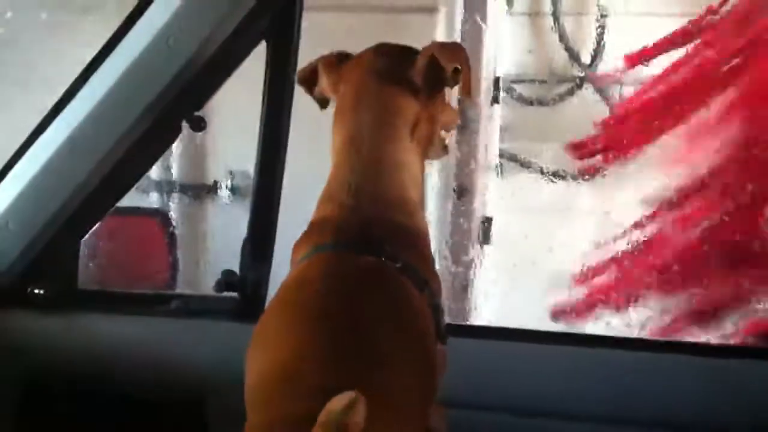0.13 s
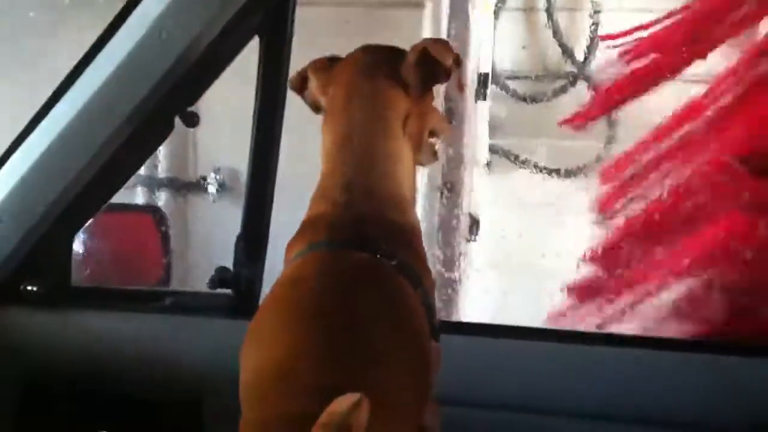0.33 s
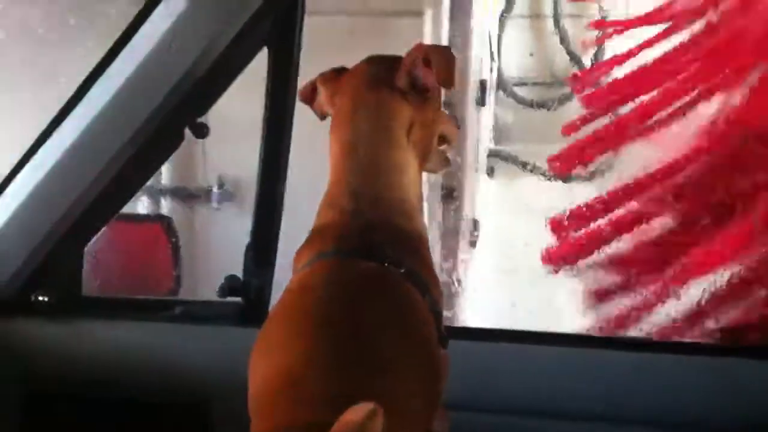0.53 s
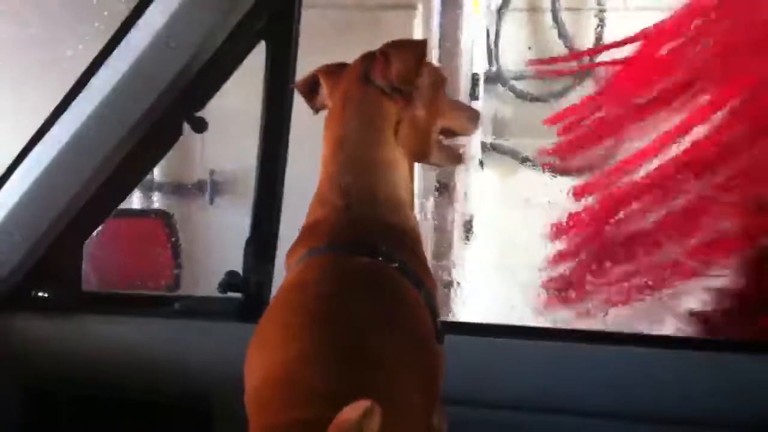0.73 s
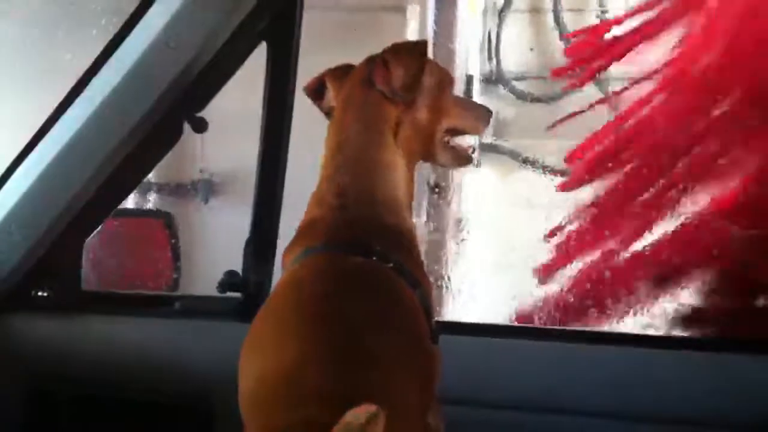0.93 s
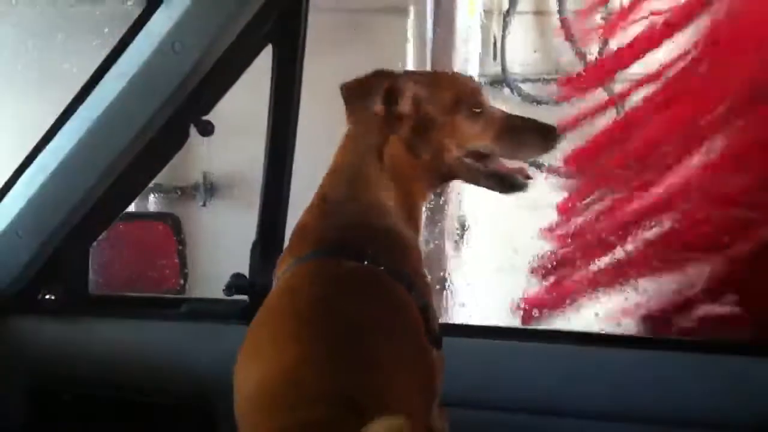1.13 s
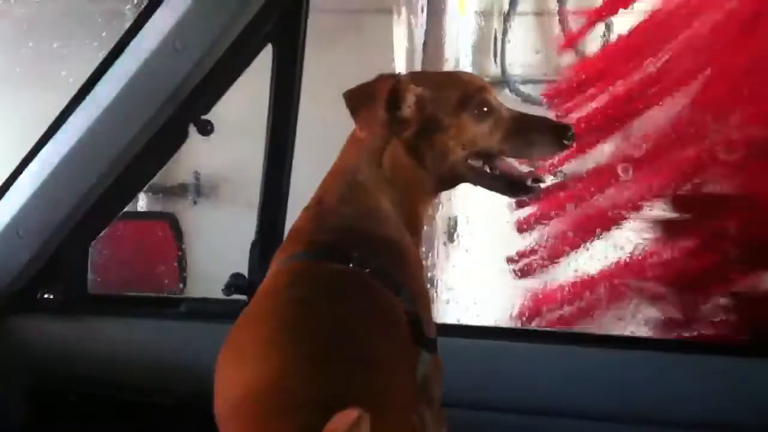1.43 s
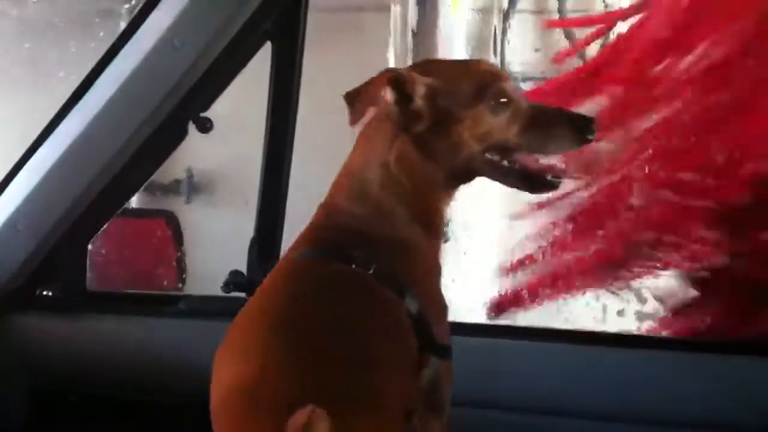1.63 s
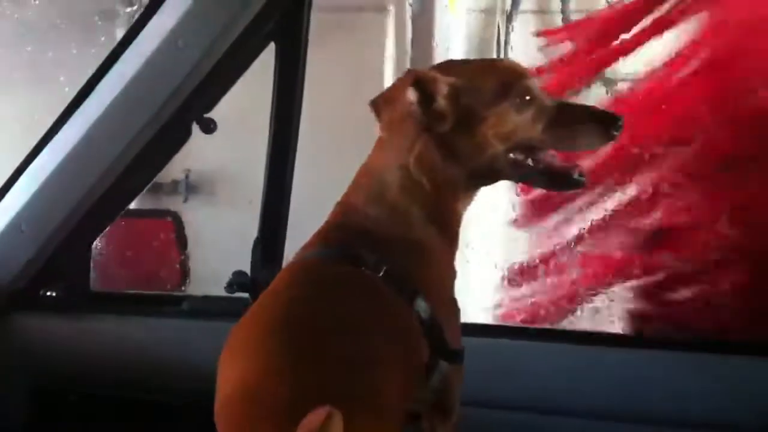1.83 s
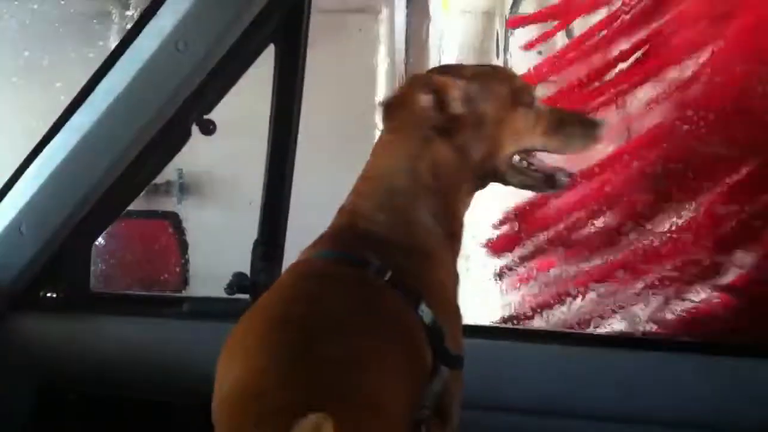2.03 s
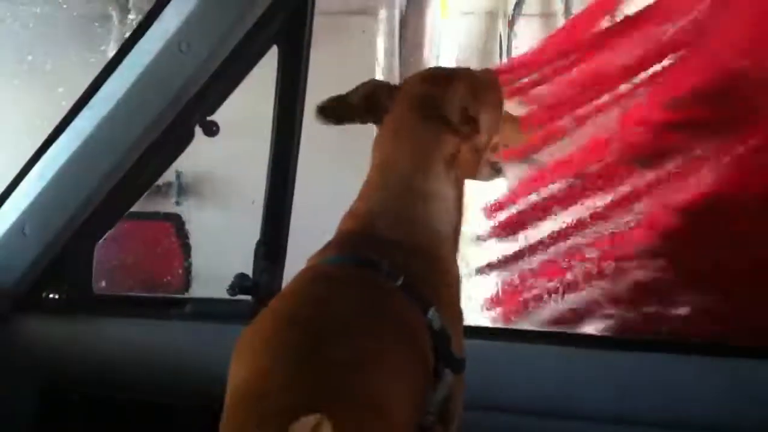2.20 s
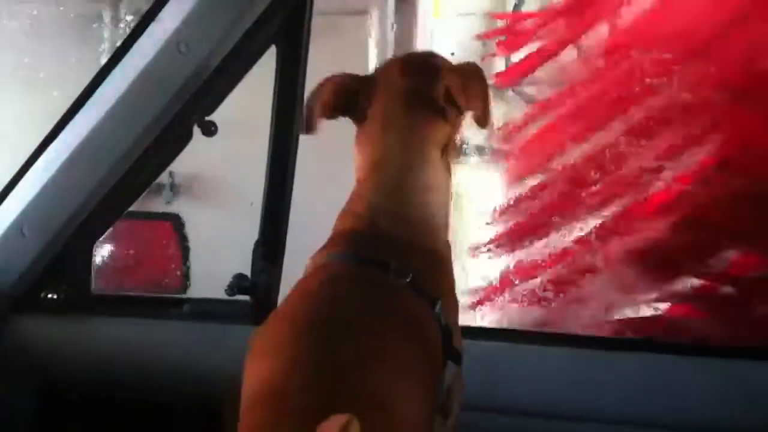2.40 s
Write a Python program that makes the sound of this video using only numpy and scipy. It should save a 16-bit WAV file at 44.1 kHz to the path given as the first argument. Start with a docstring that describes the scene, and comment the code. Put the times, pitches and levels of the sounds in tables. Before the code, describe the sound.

A spinning car wash brush drums deeply on a closed car. Heavy cloth thuds on the door while wet strips slap, swish and briefly squeak on the side window over rushing spray, heard from the front seat.

```python
"""A deep drumming booms through a closed car: the spinning cloth brush of a car wash beats on the body.
Heavy wads of cloth thud on the door, and wet strips slap, swish and squeak along the side window.
Spray patters on the glass, and now and then a sharp splash hits.
Behind it all the machinery and water rush on, slowly fading."""
import sys
import numpy as np
from scipy import signal
from scipy.fft import rfft, irfft, next_fast_len
from scipy.io import wavfile
from scipy.ndimage import uniform_filter1d

SR = 44100
rng = np.random.default_rng(int(sys.argv[2]) if len(sys.argv) > 2 else 0)


def unload_wav(signal):
    """Save mono or channel-first audio to the path in sys.argv[1] as 16-bit WAV at rate SR, clipped to [-1, 1]."""
    wavfile.write(
        sys.argv[1],
        SR,
        np.round(np.clip(np.atleast_2d(signal).T, -1, 1) * 32767).astype(np.int16),
    )


N = 112896
TIME = np.arange(N) / SR
PRE_ROLL = 8000  # samples, so textures are already sounding at the start


def from_db(db):
    """Decibels to gain."""
    return 10 ** (np.asarray(db) / 20)

def unit_rms(x):
    """Normalise to rms 1."""
    return x / np.sqrt(np.mean(x ** 2) + 1e-20)

def leveller(x, span_s):
    """Hold the running level of a texture at 1."""
    return x / np.sqrt(uniform_filter1d(x ** 2, max(int(span_s * SR), 2)) + 1e-9)

def fader(points):
    """Gain curve through (time [s], level [dB]) points."""
    return from_db(np.interp(TIME, *np.transpose(points)))

def envelope(start, attack_s, hold_s, t60_s):
    """Linear attack, hold, exponential release."""
    age = TIME - start
    return np.clip(age / attack_s, 0, 1) * 1000 ** (-np.maximum(age - attack_s - hold_s, 0) / t60_s)

def drift(rate_hz):
    """Smooth random modulation, rms 1."""
    step = 40  # samples per control point
    pole = np.exp(-2 * np.pi * rate_hz * step / SR)
    noise = rng.standard_normal(N // step + 2002)
    slow = signal.lfilter([1], [1, -2 * pole, pole * pole], noise)[2000:]
    return np.interp(np.arange(N) / step, np.arange(len(slow)), unit_rms(slow))

def impacts(per_s, spread_db):
    """Random clicks of either polarity and scattered level, pre-roll included."""
    count = N + PRE_ROLL
    hits = rng.random(count) < per_s / SR
    strength = from_db(spread_db * np.clip(rng.standard_normal(count), -2, 2))
    return hits * rng.choice([-1, 1], count) * strength + 1e-18

def equalise(x, curve):
    """Minimum-phase EQ that drops the pre-roll; rms 1."""
    size = 2 * next_fast_len(len(x))
    hz, db = np.transpose(curve)
    bin_hz = np.arange(size // 2 + 1) * SR / size
    gain = from_db(np.interp(np.log(bin_hz + 1), np.log(hz), db))
    cepstrum = irfft(np.log(gain))[:size // 2]
    cepstrum[1:] *= 2
    response = np.exp(rfft(cepstrum, size))
    return unit_rms(irfft(rfft(x, size) * response)[PRE_ROLL:PRE_ROLL + N])

def bandpass(x, low_hz, high_hz, order):
    """Butterworth band filter."""
    return signal.sosfilt(signal.butter(order, [low_hz, high_hz], "band", fs=SR, output="sos"), x)

def resonate(x, hz, t60_s=None, width_hz=None):
    """One resonance, set by its decay time or by its bandwidth."""
    radius = from_db(-60 / (t60_s * SR)) if t60_s else np.exp(-np.pi * width_hz / SR)
    return signal.lfilter([1, 0, -1], [1, -2 * radius * np.cos(2 * np.pi * hz / SR), radius ** 2], x)

def strike_modes(clicks, modes):
    """Every click strikes each mode with a strength of its own; rms 1."""
    out = 0
    for hz, db, t60_s in modes:
        struck = clicks * rng.uniform(-0.85, 1, len(clicks))
        out += from_db(db) * unit_rms(resonate(struck, hz, t60_s)[PRE_ROLL:])
    return unit_rms(out)


# EQ of the spray and machinery bed: (frequency [Hz], relative level [dB])
SPRAY_EQ = [(60, -22.5), (500, 0.5), (1100, -2), (1600, -1.6), (2300, -2.5), (3200, -8.5), (5000, -14.5),
            (8500, -19.5), (12000, -27), (16000, -35)]

def spray(start_db=-38.5, fade_db_per_s=0.82, flutter_db=0.97):
    """Fine drops rush on the car in uneven sheets, slowly moving away."""
    drops = equalise(impacts(per_s=9000, spread_db=3.5), SPRAY_EQ)
    return drops * from_db(start_db - fade_db_per_s * TIME + flutter_db * drift(rate_hz=33))


# Brief dips in spray and rubbing: (centre time [s], length [s], depth [dB])
WASH_DIPS = [(0.22, 0.041, 2), (1.583, 0.044, 1.5), (1.965, 0.026, 1.5), (2.144, 0.086, 1),
             (2.406, 0.036, 2)]

def lulls():
    """Gain that ducks smoothly each time the wash eases."""
    dip_db = sum(db * np.exp(-(2 * (TIME - centre) / length) ** 2) for centre, length, db in WASH_DIPS)
    return from_db(-dip_db)


def wet_rings(low_hz=757.4, high_hz=2534, level_db=-42, tilt_db_per_octave=-5):
    """Wet cloth tips catch on the glass at random, each ringing briefly at one of 30 pitches."""
    out = 0
    for hz in np.geomspace(low_hz, high_hz, 30):
        catches = impacts(per_s=7, spread_db=1.5)[PRE_ROLL:]
        detuned_hz = hz * (1 + 0.02 * rng.standard_normal())
        pings = resonate(catches, detuned_hz, t60_s=0.03)
        rounded = resonate(pings, detuned_hz, t60_s=0.03)  # a second pass softens the attack
        out += from_db(tilt_db_per_octave * np.log2(hz / low_hz)) * rounded
    return from_db(level_db) * leveller(out, span_s=0.195)


# Sharp splash accents: (time [s], level [dB], centre frequency [Hz])
SPLASH_CUES = [(.078, -46, 8000), (.104, -45, 11000), (.258, -48, 7500), (.470, -47, 9400),
               (.479, -48, 7000), (1.422, -48, 13000), (1.586, -54, 13000), (2.182, -41.5, 8300),
               (2.185, -48, 13300), (2.454, -50, 8360)]

def splashes():
    """Water hits the glass in short, bright spits."""
    out = 0
    for start, db, hz in SPLASH_CUES:
        spit = unit_rms(resonate(rng.standard_normal(N), hz, width_hz=1800))
        out += from_db(db) * envelope(start, attack_s=0.00081, hold_s=0.0019, t60_s=0.042) * spit
    return out


# Wet cloth dragging on glass: (time [s], level [dB], centre frequency [Hz], bandwidth [Hz])
SQUEAK_CUES = [(.05, -40, 2120, 350), (.118, -37, 2030, 320), (.293, -35.5, 2400, 700),
               (0.426, -34, 1110, 150), (1.428, -37.5, 1920, 400), (1.63, -45, 2270, 900),
               (1.655, -37, 2130, 500), (1.704, -33.5, 1150, 200), (2.268, -34, 1980, 320)]

def squeaks():
    """A strip sticks and slips on the glass: a narrow resonance squeaks, a wide one scrapes."""
    out = 0
    for start, db, hz, width in SQUEAK_CUES:
        slip = bandpass(rng.standard_normal(N), hz - width / 2, hz + width / 2, order=2)
        stroke = envelope(start, attack_s=0.0051, hold_s=0.006, t60_s=0.08)
        out += from_db(db) * stroke * leveller(slip, span_s=0.026)
    return out


# Fader ride of the rubbing cloth: (time [s], level [dB])
RUB_FADER = [(0.0, -26), (0.15, -32), (0.16, -29), (0.22, -30), (0.26, -32), (0.37, -34.5), (0.41, -30.5),
             (0.56, -33), (0.62, -28.5), (0.66, -34.5), (1.05, -29), (1.07, -34), (1.5, -31.5),
             (1.58, -36.5), (1.61, -30), (1.85, -34.5), (2.56, -32)]
# EQ of its swish: (frequency [Hz], relative level [dB])
RUB_EQ = [(60, -42), (200, -20), (330, 1.5), (420, -1), (520, -2.5), (750, 0), (1150, -9.5), (1500, -14.5),
          (2200, -12.5), (3200, -23.5), (6000, -41.5), (12000, -75)]
# Door and window resonances: (frequency [Hz], relative level [dB], decay T60 [s])
WINDOW_MODES = [(375, 2.5, 0.072), (400.6, -7, 0.052), (606, -5, 0.054), (715.4, -8, 0.07),
                (783, -8.5, 0.066), (1006, -14, 0.19), (1114, -13, 0.08), (1262, -13.5, 0.067),
                (2047, -17.5, .03), (2353, -16.5, 0.066)]

def rubbing(softness_hz=2630):
    """Cloth tips flick densely over door and window, too soft to excite much treble."""
    window = strike_modes(impacts(per_s=700, spread_db=0.5), WINDOW_MODES)
    flicks = bandpass(window, 260, softness_hz, order=3)
    swish = equalise(impacts(per_s=2500, spread_db=3), RUB_EQ)
    rub = from_db(-5) * swish + from_db(-3.5) * flicks
    return fader(RUB_FADER) * np.std(rub) * leveller(rub, span_s=0.049)


# Strips landing on the window: (time [s], hold [s], smack level [dB], hiss level [dB])
SLAP_CUES = [(0.041, 0.038, -39.5, -44.5), (0.075, 0.0067, -35, -40), (0.09, 0.016, -38.5, -46),
             (0.114, 0.002, -47, -38), (0.165, 0.014, -39, -45), (0.251, 0.021, -36.5, -46),
             (0.283, 0.007, -47, -43), (0.342, 0.002, -46, -40.5), (0.38, 0.03, -41, -48),
             (0.472, 0.0087, -35.5, -41.5), (0.53, 0.043, -39, -47.5), (0.597, 0.01, -41, -49),
             (0.637, 0.005, -36.5, -43.5), (0.696, 0.016, -49, -62), (0.746, 0.017, -48, -51),
             (0.771, 0.027, -34.5, -45.5), (0.85, 0.016, -37, -43.5), (0.884, 0.0098, -35.5, -51),
             (0.933, 0.024, -36, -47), (0.987, 0.006, -35, -42), (1.008, 0.013, -35.5, -42.5),
             (1.073, 0.008, -35, -48), (1.108, 0.015, -36, -48), (1.16, 0.022, -49, -48),
             (1.221, 0.02, -35, -48), (1.258, 0.012, -34, -46), (1.317, 0.025, -36.5, -47),
             (1.361, 0.01, -33.5, -41), (1.42, 0.015, -32, -43), (1.626, 0.012, -32.5, -43.5),
             (1.649, 0.015, -31.5, -44), (1.688, 0.0094, -36.5, -45.5), (1.853, 0.032, -38.5, -48.5),
             (1.896, 0.03, -35.5, -56), (1.981, 0.0074, -31.5, -45.5), (2.006, 0.0053, -42, -50),
             (2.065, 0.02, -39, -50), (2.181, 0.028, -35, -45.5), (2.273, 0.015, -37, -45.5),
             (2.329, 0.002, -34.5, -48), (2.439, 0.03, -36.5, -49), (2.483, 0.02, -35.5, -50.5)]
# EQ of the midrange cloth smack: (frequency [Hz], relative level [dB])
SMACK_EQ = [(60, -56), (300, -16), (700, 4.5), (1150, 2.5), (1550, -3.5), (2200, -2.5), (3000, -12),
            (5000, -28.5), (10000, -34), (15000, -60)]
# EQ of the bright water hiss: (frequency [Hz], relative level [dB])
HISS_EQ = [(200, -41), (1500, -4), (3300, 6), (5500, -2), (8500, -6), (12000, -13.5), (16000, -16)]

def slaps():
    """Each wet strip lands with a grainy smack and a hiss of flung water."""
    smack_power, hiss_power = 0, 0
    for start, hold_s, smack_db, hiss_db in SLAP_CUES:
        stroke = envelope(start, attack_s=0.0029, hold_s=hold_s, t60_s=0.074)
        smack_power += (stroke * from_db(smack_db)) ** 2
        hiss_power += (stroke * from_db(hiss_db)) ** 2
    cloth = leveller(equalise(impacts(per_s=3000, spread_db=4.5), SMACK_EQ), span_s=0.011)
    water = leveller(equalise(impacts(per_s=9000, spread_db=2.5), HISS_EQ), span_s=0.0071)
    return np.sqrt(smack_power) * cloth + np.sqrt(hiss_power) * water


# Heavy wads of cloth hitting the door: (time [s], level [dB], pitch [Hz])
THUD_CUES = [(0.035, -16, 163.4), (0.07, -21, 144), (.075, -25, 230), (0.122, -19.5, 210), (.164, -18, 209),
             (.187, -21.5, 298), (.204, -16, 186), (.265, -18.5, 197), (0.287, -21.5, 262),
             (.410, -27, 293), (0.438, -28, 294), (.604, -26, 342), (0.608, -18.5, 224), (.620, -24.5, 380),
             (.639, -20.5, 191), (.672, -18, 183), (.703, -19.5, 147), (.791, -18.5, 165),
             (0.851, -17.5, 176), (.915, -19.5, 167), (.936, -20.5, 259), (.960, -25, 378),
             (1.034, -17.5, 223), (1.347, -20.5, 162), (1.37, -24, 144), (1.411, -21, 184),
             (1.431, -15, 199), (1.466, -19.5, 182), (1.631, -24.5, 318), (1.712, -20.5, 190),
             (1.79, -22, 255), (1.957, -25.5, 291), (2.014, -19, 173), (2.155, -25, 213), (2.234, -28, 155),
             (2.39, -25.5, 313)]

def thuds(low_cut_hz=90):
    """Each heavy blow pushes the door through a few cycles."""
    blows = 0
    for start, db, hz in THUD_CUES:
        punch = envelope(start, attack_s=0.0045, hold_s=0.0055, t60_s=0.042)
        blows += from_db(db) * punch * np.sin(2 * np.pi * hz * (TIME - start))
    return signal.sosfilt(signal.butter(4, low_cut_hz, "high", fs=SR, output="sos"), blows)


# Fader ride of the brush on the body: (time [s], level [dB])
DRUM_FADER = [(0.0, -27.5), (0.06, -24), (0.3, -29.5), (0.33, -30), (0.36, -27), (0.52, -28.5),
              (0.63, -26.5), (0.93, -24.5), (1.01, -31), (1.04, -26.5), (1.08, -28.5), (1.28, -27.5),
              (1.3, -34), (1.35, -24.5), (1.48, -26), (1.6, -31), (1.73, -27.5), (1.97, -30), (2.03, -28),
              (2.07, -32.5), (2.15, -28), (2.27, -29), (2.3, -31), (2.49, -27), (2.56, -27)]
# EQ of the body and cabin boom: (frequency [Hz], relative level [dB])
BOOM_EQ = [(25, -58.5), (42, -49), (58, -16.5), (72, -19), (100, -4.5), (130, 0.5), (210, 2.5), (300, -8),
           (480, -18), (900, -54.5)]
# Body panel resonances: (frequency [Hz], relative level [dB], decay T60 [s])
PANEL_MODES = [(120.6, -7, 0.13), (146.8, -2, 0.11), (180.8, -4, 0.1), (214.7, -6, 0.32),
               (281.5, -13, 0.33)]

def drumming():
    """The brush drums on the panels and the cabin booms."""
    thumps = impacts(per_s=160, spread_db=1.5)
    panels = bandpass(strike_modes(thumps, PANEL_MODES), 100, 420, order=3)
    boom = equalise(impacts(per_s=900, spread_db=0), BOOM_EQ)
    body = from_db(-2.5) * (boom + panels)
    return fader(DRUM_FADER) * np.std(body) * leveller(body, span_s=0.0494)


def scene():
    """The mono mix, as heard from the front seat."""
    low_end = drumming() + thuds()
    wash = lulls() * (rubbing() + spray())
    glass = slaps() + squeaks() + splashes() + wet_rings()
    return (low_end + wash + glass)[None]

def record(dry):
    """A steep high cut takes off the very top."""
    cutoff_hz = 15650
    return signal.sosfilt(signal.ellip(12, 0.1, 90, cutoff_hz, fs=SR, output="sos"), dry)


dry = scene()
out = record(dry)
unload_wav(out)
```